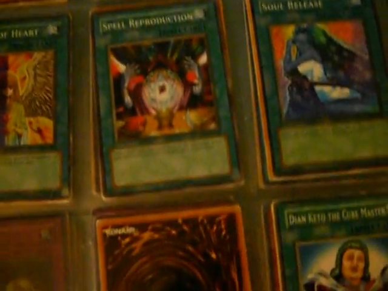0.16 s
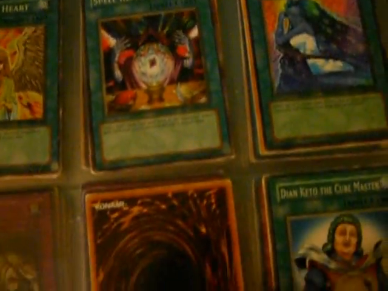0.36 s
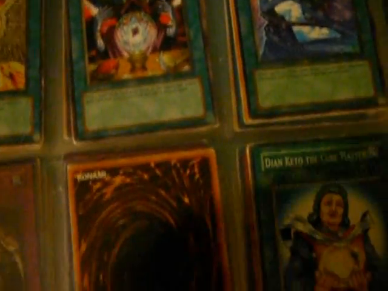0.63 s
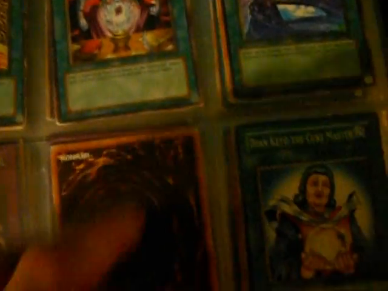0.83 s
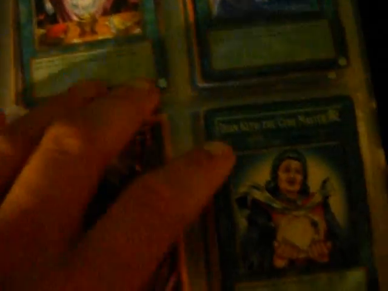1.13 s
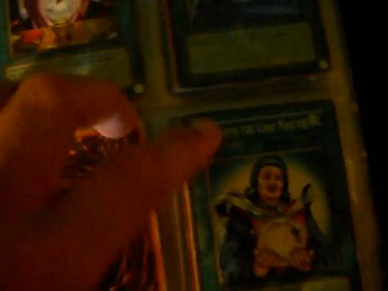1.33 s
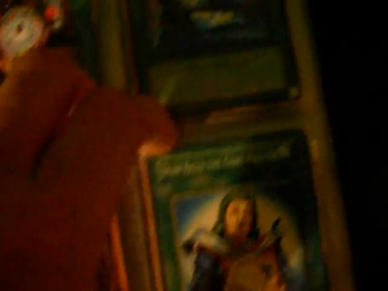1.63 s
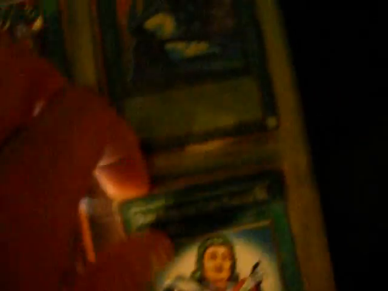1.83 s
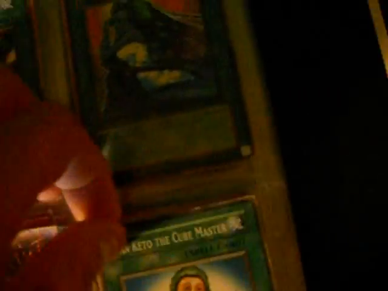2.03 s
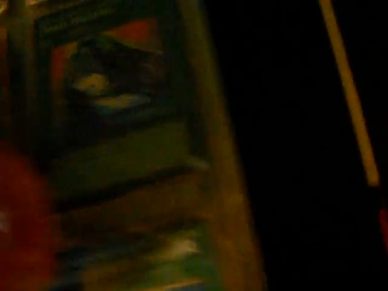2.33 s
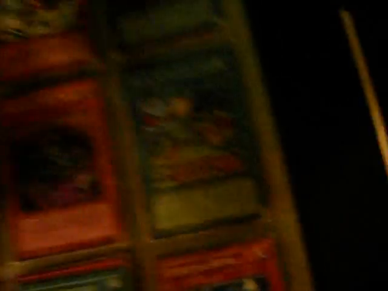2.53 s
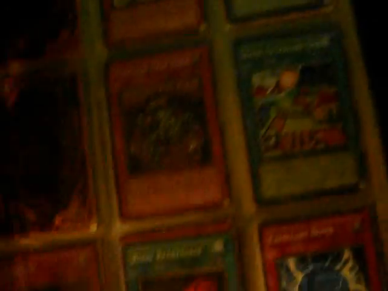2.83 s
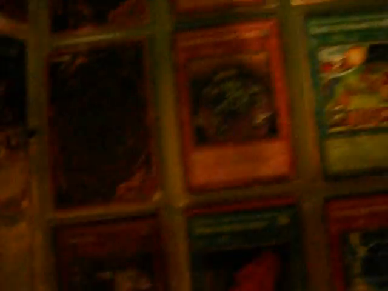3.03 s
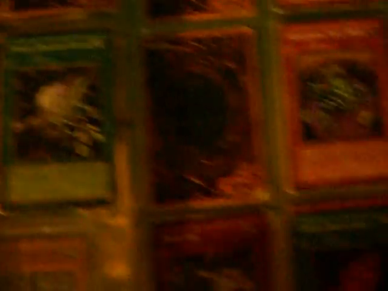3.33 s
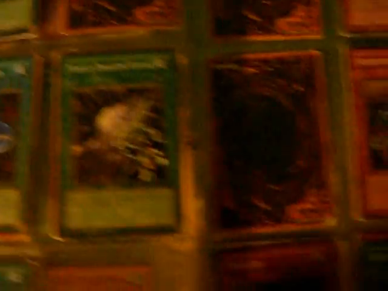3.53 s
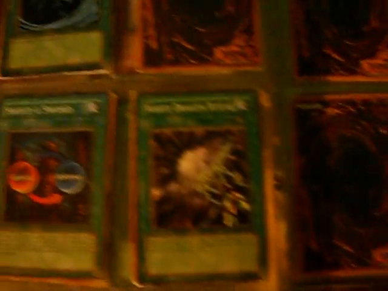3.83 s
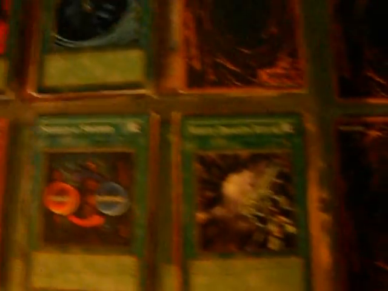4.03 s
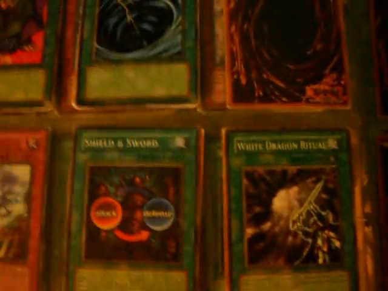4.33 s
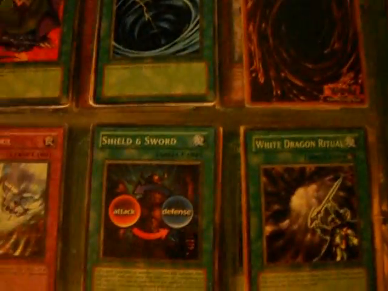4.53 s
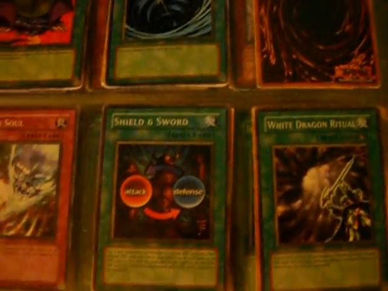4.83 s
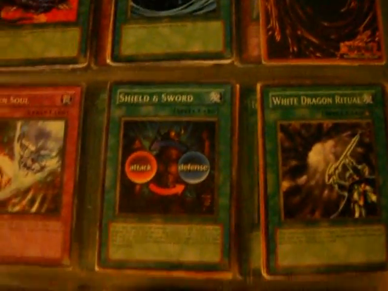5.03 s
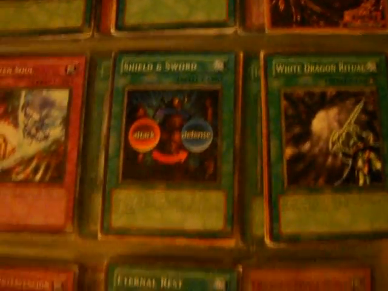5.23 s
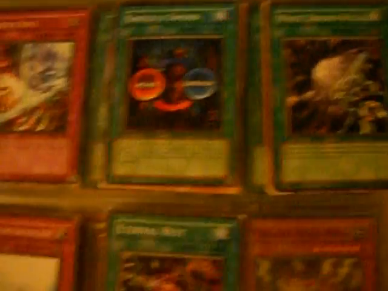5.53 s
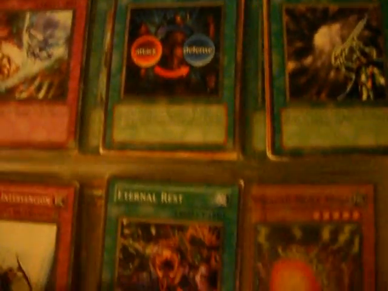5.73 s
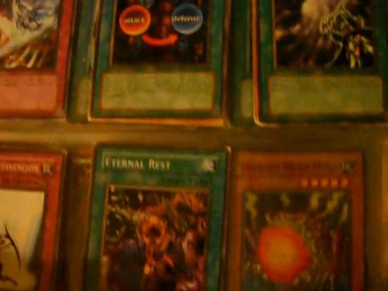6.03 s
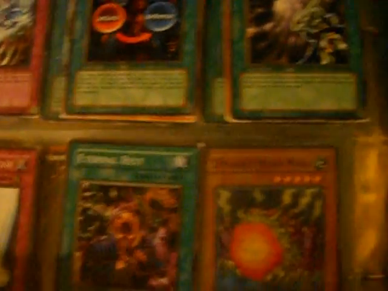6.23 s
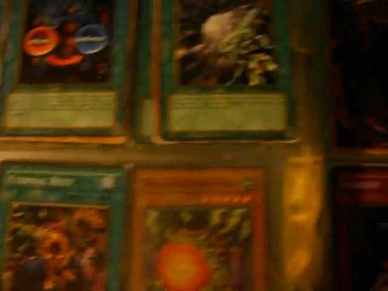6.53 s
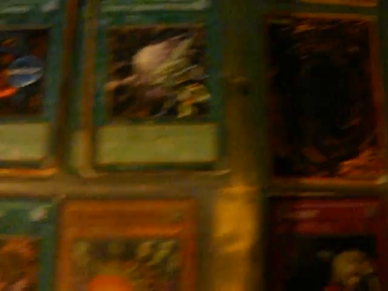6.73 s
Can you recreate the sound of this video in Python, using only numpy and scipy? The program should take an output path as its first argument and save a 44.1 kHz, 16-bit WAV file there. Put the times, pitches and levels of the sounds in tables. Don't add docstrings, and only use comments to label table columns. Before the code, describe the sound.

A close, low-quality mono camera microphone hisses and rumbles in a small quiet room. After a brief hand swish, fingers thump a padded binder cover, then plastic card pages pop and crackle in uneven clusters, with hollow card knocks, page pats and short rustles. The loudest snaps clip. A last small burst leaves only hiss.

```python
import sys
import numpy as np
from scipy import signal
from scipy.fft import rfft, irfft, next_fast_len
from scipy.io import wavfile
from scipy.ndimage import uniform_filter1d, minimum_filter1d, map_coordinates

SR = 44100
rng = np.random.default_rng(int(sys.argv[2]) if len(sys.argv) > 2 else 0)


def natural_amplitude(level_db):
    exponent = np.asarray(level_db, float) / 20
    return 10 ** exponent


def digitize_waveform(pressure):
    field = np.atleast_2d(pressure).T
    bounded = np.clip(field, -1, 1)
    quanta = np.round(bounded * 32767).astype(np.int16)
    wavfile.write(sys.argv[1], SR, quanta)


N = 303408

# (time [s], peak [dB], film pitch [Hz], upper ring [dB])
DRY_CREASES = [(1.7968, -29, 2660, 11), (1.8944, -27.5, 1640, -0.5), (2.1767, -27.5, 2850, -28),
               (2.206, -1.5, 2480, -35), (2.6795, -14, 1500, -25), (2.7005, -28, 2610, -10),
               (2.7374, -19, 3630, -17), (2.7453, -9, 3290, 5), (2.7755, -27.5, 3380, 3.5),
               (3.252, -26.5, 3580, 8), (3.2634, -28, 2370, 11), (3.5466, -20, 1780, -38),
               (3.7785, -3.5, 1644, -20), (3.8965, -31.5, 1750, -15), (4.0532, -41, 3500, -18.5),
               (4.201, -8, 2360, -13.5), (4.3287, -26.5, 1567, -34), (4.4332, -23, 2240, -3),
               (4.6945, -20, 2440, -15), (4.7, -19, 2300, -1), (4.7211, 0, 2480, 6),
               (4.7288, -11, 3810, -25), (4.74, -22.5, 2260, -10), (4.8311, -13, 3370, 9)]
# (time [s], peak [dB], film pitch [Hz], knock [dB], knock pitch [Hz])
POCKET_CREASES = [(1.8332, -28, 2370, -12.5, 845), (2.1966, -29.5, 2300, 3.5, 428),
                  (2.3411, -25, 2280, -8.5, 870), (2.4911, -1, 2085, -15.5, 880),
                  (2.5124, -5, 3020, -9, 755), (2.8324, -23, 2100, -2, 737),
                  (2.9368, -29.5, 1330, -11, 921), (2.9709, -25, 3120, -3.5, 780),
                  (3.0191, -20, 3310, -10, 853), (3.0374, -15, 2140, -1, 764),
                  (3.7784, -3.5, 2360, -2, 585), (3.7884, -25, 1660, 4, 685), (3.7966, -26, 1490, -5, 657),
                  (4.0635, -27.5, 2330, -7.5, 1000), (4.2952, -29, 2420, -9.5, 403),
                  (4.5239, -25.5, 2330, -16, 870), (4.5469, -23.5, 2200, -11.5, 700),
                  (4.6743, -29.5, 2360, -6, 837), (4.8431, -27, 1840, -19, 439),
                  (5.0292, -27, 1760, -8.5, 806), (5.1398, -11.5, 1350, -20.5, 870),
                  (5.1864, -32, 2440, 0.5, 802), (5.1959, -13.5, 1280, -6.5, 637)]
# (time [s], peak [dB], knock pitch [Hz])
CARD_DROPS = [(2.0358, -45.5, 620), (2.5012, -34, 930), (2.5228, -37, 850), (2.5384, -49, 624),
              (2.8208, -40.5, 760), (2.908, -42, 415), (2.9604, -40, 744), (2.9834, -47, 807),
              (3.0278, -33, 703), (3.0504, -33, 675), (3.0744, -44.5, 860), (3.0824, -40, 627),
              (3.7631, -39, 586)]
# (time [s], peak [dB], film pitch [Hz])
FAINT_TICKS = [(1.6524, -33, 1530), (2.9008, -35, 1800), (2.9612, -32.5, 3120), (3.2226, -36, 1200),
               (3.3064, -40, 2980), (3.5244, -33, 2380), (3.7214, -35, 1650), (4.0407, -32, 2260),
               (5.0544, -32, 2270), (5.135, -27, 1300), (5.3143, -36, 2160)]
# (frequency [Hz], T60 [s])
ROOM_DECAY = [(300, .2), (1500, 0.12), (4500, .12)]
# (time [s], peak [dB], pitch [Hz], T60 [s])
COVER_THUMPS = [(1.585, -42.5, 148, 0.16), (1.66, -40, 148, 0.08), (1.723, -20.5, 151, 0.094),
                (1.811, -58, 61.9, 0.08), (1.811, -35.5, 146, 0.24), (1.894, -31.5, 166, 0.073),
                (2.205, -35.5, 149, 0.07), (2.748, -40.5, 80.7, 0.046), (2.821, -27.5, 61.6, 0.099),
                (2.832, -22.5, 197, 0.02), (3.017, -22, 191, 0.021), (3.038, -34.5, 82, 0.076),
                (3.081, -37, 61.9, 0.078), (3.27, -40.5, 61.6, 0.11)]
# (time [s], peak [dB], pitch [Hz], T60 [s])
EDGE_PATS = [
    (2.737, -32.5, 560, 0.03),
    (2.743, -31.5, 486, 0.03),
    (2.832, -30, 280, 0.023),
    (2.958, -34.5, 465, 0.03),
    (3.016, -24, 302, 0.024),
    (3.036, -15, 512, 0.022),
    (3.05, -39, 534, 0.03),
    (3.08, -31, 515, 0.016),
    (5.195, -31.5, 477, 0.023),
]
# (crest time [s], rise [s], fall [s], film rustle [dB], card rub [dB])
HAND_STROKES = [(1.112, .06, .025, -37.5, -64), (1.16, 0.25, 0.067, -52, -58), (1.485, .09, .02, -44, -64),
                (1.507, 0.021, 0.027, -23.5, -39), (2.202, 0.033, 0.014, -45.5, -48.5),
                (2.707, .03, 0.015, -38.5, -48.5), (2.968, 0.029, 0.056, -54.5, -41),
                (3.059, 0.088, 0.088, -51, -39), (3.256, 0.022, 0.055, -52, -43.5),
                (3.29, 0.047, 0.024, -57, -40), (3.33, 0.015, .03, -53, -50),
                (3.311, .02, .012, -39.5, -68), (3.363, .06, 0.039, -38.5, -38.5),
                (3.42, 0.14, 0.12, -55, -47), (3.52, .1, 0.028, -46.5, -50),
                (3.644, .05, 0.054, -38.5, -41.5), (3.749, 0.2, .03, -48.5, -46),
                (4.055, 0.055, 0.016, -42, -47.5), (4.685, 0.061, .01, -47, -52.5),
                (4.75, 0.044, .12, -46, -58), (2.752, 0.01, .05, -40, -38)]
# (frequency [Hz], width [Hz], level [dB])
FILM_MODES = [(1200, 900, -10.5), (2400, 1700, -6.5), (3500, 560, 0), (4240, 610, -5)]
# (frequency [Hz], width [Hz], level [dB])
STACK_MODES = [(560, 110, 4.5), (705, 64, 9.5), (824, 110, 6.5)]
# (time [s], level [dB])
HISS_LEVEL = [(0.0, -45), (1.7, -44), (2.45, -44), (2.57, -51.5), (2.72, -49), (3.05, -48.5), (3.2, -50.5),
              (3.27, -50.5), (3.54, -47), (4.14, -49), (5.31, -51.5), (5.77, -49), (6.02, -46.5),
              (6.88, -46.5)]
# (frequency [Hz], density [dB per Hz])
HISS_SPECTRUM = [(35, -42.5), (60, -0.5), (125, -2.5), (256, -4), (488, -3.5), (533, -3), (3000, -8),
                 (3900, -18), (5070, -48), (8580, -120)]
# (frequency [Hz], density [dB per Hz])
RUMBLE_SPECTRUM = [(8, -16.5), (24, 4), (50, -4.5), (110, -27.5), (200, -67)]
# (frequency [Hz], gain [dB])
CONVERTER_RESPONSE = [(3000, 0), (3700, -4), (3880, -11), (4010, -20), (4100, -17), (4200, -13),
                      (4500, -16), (4850, -30), (5050, -42), (5250, -58), (5500, -120)]
# (time [s], share shaved off the crest [0-1])
CLIPPED_SNAPS = [
    (2.492, .22),
    (3.780, 0.12),
]

POCKET_HZ, SHEET_HZ, UPPER_DB = 850, 2000, -7
DRY_KNOCK_DB, TICK_KNOCK_DB, FULL_KNOCK_DB = -26, -9, 8.5
STROKE_RANGE_DB = 25
SETTLE_RUSTLE_DB, SETTLE_RUB_DB = -43.5, -34
SETTLE_T60_S, SETTLE_DELAY_S = 0.24, 0.01
GRIP_DB, GRIP_DRIFT_DB = -8.5, 1.5
IMAGE_DB, FIRST_RATE_HZ = -64.5, 11025
RAIL = 0.97


def unit(x):
    return x / np.sqrt(np.mean(x ** 2) + 1e-20)


def along(points, hz):
    f, v = np.transpose(points)
    return np.interp(np.log(hz + 1), np.log(f + 1), v)


def wobble(rate_hz):
    knots = rng.standard_normal(int(N * rate_hz / SR) + 4)
    return map_coordinates(knots, [np.arange(N) * rate_hz / SR])


def filtered(x, response):
    m = next_fast_len(N + SR // 2)
    return irfft(rfft(x, m) * response(np.fft.rfftfreq(m, 1 / SR)), m)[..., :N]


def resonant(x, modes):
    def body(f):
        total = 0
        for k, (hz, width_hz, db) in enumerate(modes):
            damping = 1j * f * width_hz
            total = total + (-1) ** k * natural_amplitude(db) * damping / (hz * hz - f * f + damping)
        return total
    return unit(filtered(x, body))


def ring(t, hz, t60_s, attack_s):
    shape = natural_amplitude(-60 * t / t60_s) * (1 - np.exp(-t / attack_s))
    return np.sin(2 * np.pi * hz * t) * shape / shape.max()


def creases():
    dry = [(s, db, hz, DRY_KNOCK_DB, POCKET_HZ, upper_db) for s, db, hz, upper_db in DRY_CREASES]
    pocket = [(*row, UPPER_DB) for row in POCKET_CREASES]
    drops = [(s, db, SHEET_HZ, FULL_KNOCK_DB, hz, UPPER_DB) for s, db, hz in CARD_DROPS]
    ticks = [(s, db, hz, TICK_KNOCK_DB, POCKET_HZ, UPPER_DB) for s, db, hz in FAINT_TICKS]
    return sorted(dry + pocket + drops + ticks)


def snap(t, hz, knock_db, knock_hz, upper_db, luck):
    flip = natural_amplitude(9) * ring(t, np.sqrt(hz * 2800), 0.0014, 0.00012)
    film = ring(t, hz, 0.0086, 0.000514)
    film += natural_amplitude(-10 + 2 * luck[0]) * ring(t, hz * 0.55 * np.exp(0.12 * luck[1]), 0.0017, 0.00013)
    upper = ring(t, 3450 * np.exp(0.062 * luck[2]), 0.0093, 0.00052)
    upper += natural_amplitude(6.5) * ring(t, 4280 * np.exp(0.025 * luck[3]), 0.0056, 0.0005)
    noise = np.diff(rng.standard_normal(len(t) + 1))
    crack = natural_amplitude(18.5) * (hz / SHEET_HZ) ** 1.2 * natural_amplitude(-60 * t / 0.007) * noise
    knock = ring(t, knock_hz, 0.014, 0.00092)
    knock -= natural_amplitude(-9.5) * ring(t, knock_hz * 1.332 * np.exp(0.12 * luck[4]), 0.012, 0.00041)
    return flip + film + crack - natural_amplitude(upper_db) * upper + natural_amplitude(knock_db + 12) * knock


def snaps():
    out, t = np.zeros(N + SR), np.arange(SR // 8) / SR
    rows = creases()
    lucks = rng.standard_normal((len(rows), 8))
    heard = natural_amplitude(along(CONVERTER_RESPONSE, np.fft.rfftfreq(len(t), 1 / SR)))
    for (s, db, hz, knock_db, knock_hz, upper_db), luck in zip(rows, lucks):
        dry = snap(t, hz, knock_db, knock_hz, upper_db, luck)
        peak = np.abs(irfft(rfft(dry) * heard, len(t))).max()
        dry = dry / peak * natural_amplitude(db + 0.44) * np.hypot(1, natural_amplitude(knock_db + 2.5))
        start = round((s + 0.0008) * SR)
        out[start:start + len(t)] += dry + natural_amplitude(-17) * room(dry)
    return filtered(out[:N], lambda f: (1j * f / (310 + 1j * f)) ** 3)


def room(x):
    hz, t, z = signal.stft(rng.standard_normal(len(x)), SR, nperseg=128)
    decay = natural_amplitude(-60 * t / along(ROOM_DECAY, hz)[:, None])
    tail = signal.istft(z * decay, SR, nperseg=128)[1]
    return signal.fftconvolve(np.pad(x, (90, 0)), tail / np.linalg.norm(tail))[:len(x)]


def thumps():
    out, t = np.zeros(N + SR), np.arange(SR // 4) / SR
    for s, db, hz, t60_s in COVER_THUMPS + EDGE_PATS:
        start = round(s * SR)
        out[start:start + len(t)] += natural_amplitude(db) * ring(t, hz, max(t60_s, 0.01), 0.001)
    return out[:N]


def motion():
    t, gains = np.arange(N) / SR, np.zeros((2, N))
    for s, rise_s, fall_s, *db in HAND_STROKES:
        distance = np.maximum((s - t) / rise_s, (t - s) / fall_s)
        gains += natural_amplitude(np.array(db)[:, None] - STROKE_RANGE_DB * distance)
    since = t[:SR // 4]
    for s, db, _, knock_db, *_ in creases():
        start = round((s + SETTLE_DELAY_S) * SR)
        level_db = db + np.array([[SETTLE_RUSTLE_DB], [SETTLE_RUB_DB + knock_db]])
        gains[:, start:start + len(since)] += natural_amplitude(level_db - 60 * since / SETTLE_T60_S)
    return gains


def friction_ticks(share):
    struck = rng.random(N) < share
    strength = natural_amplitude(3 * rng.exponential(size=N))
    return rng.standard_normal(N) * (struck * strength + 0.35)


def handling():
    rustle_gain, rub_gain = uniform_filter1d(motion(), size=200, axis=1)
    rustle = resonant(friction_ticks(0.02) * natural_amplitude(3 * wobble(60)), FILM_MODES)
    rub = resonant(friction_ticks(0.018) * natural_amplitude(3 * wobble(41)), STACK_MODES)
    return rustle_gain * rustle + rub_gain * rub


def camera_noise():
    s, level_db = np.transpose(HISS_LEVEL)
    hiss_db = np.interp(np.arange(N) / SR, s, level_db)
    rumble_db = GRIP_DB + GRIP_DRIFT_DB * wobble(1.3)
    flat_top = [point for point in HISS_SPECTRUM if point[0] < 3500]
    hiss = unit(filtered(rng.standard_normal(N), lambda f: natural_amplitude(along(flat_top, f)) * (f < 6000)))
    rumble = filtered(rng.standard_normal(N), lambda f: natural_amplitude(along(RUMBLE_SPECTRUM, f)))
    rumble = unit(natural_amplitude(2.4 * wobble(5.9)) * rumble)
    return natural_amplitude(hiss_db + 1 + 0.45 * wobble(11)) * (hiss + natural_amplitude(rumble_db) * rumble)


def scene():
    return (snaps() + thumps() + handling() + camera_noise())[None]


def top_cut(x):
    return signal.sosfilt(signal.butter(12, 15600, fs=SR, output="sos"), x)


def record(dry):
    x = filtered(dry, lambda f: natural_amplitude(along(CONVERTER_RESPONSE, f)))
    dent = np.array([0.1, 0.6, 1, 0.6, 0.1])
    for s, share in CLIPPED_SNAPS:
        near = round(s * SR) - 180
        crest = near + np.abs(x[0, near:near + 360]).argmax() + np.arange(-2, 3)
        x[:, crest] *= 1 - share * dent
    x = x * (1 + natural_amplitude(IMAGE_DB) * np.cos(2 * np.pi * FIRST_RATE_HZ * np.arange(N) / SR))
    room_left = minimum_filter1d(np.minimum(1, RAIL / (np.abs(x) + 1e-9)), size=129)
    limited = x * uniform_filter1d(room_left, size=64)
    mix = limited + natural_amplitude(-96) * rng.standard_normal(x.shape)
    return top_cut(mix)


dry = scene()
out = record(dry)
digitize_waveform(out)
```